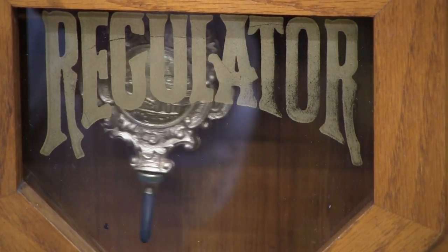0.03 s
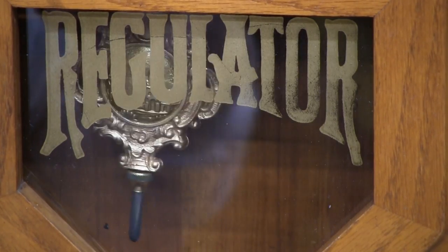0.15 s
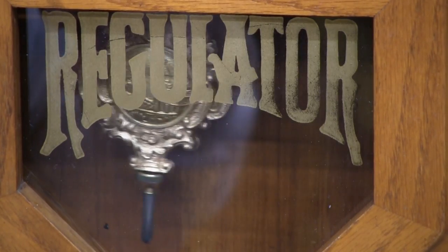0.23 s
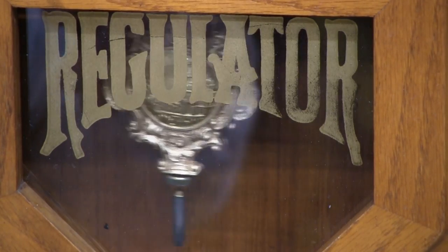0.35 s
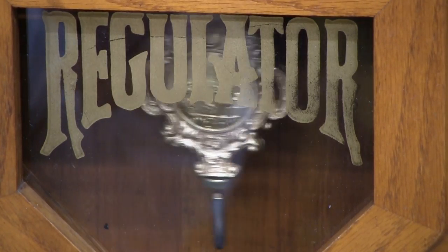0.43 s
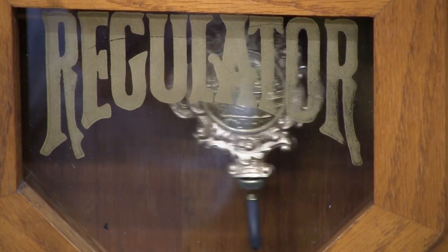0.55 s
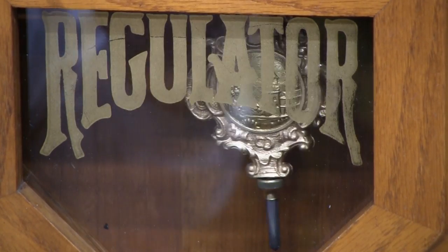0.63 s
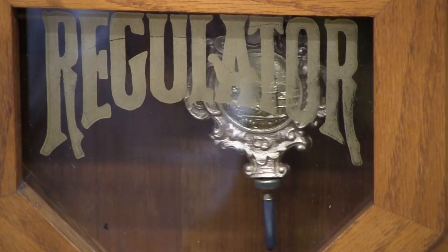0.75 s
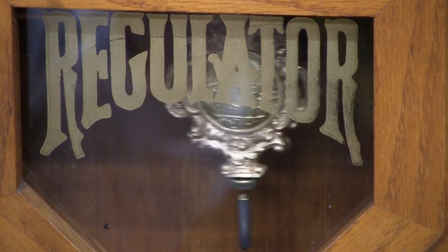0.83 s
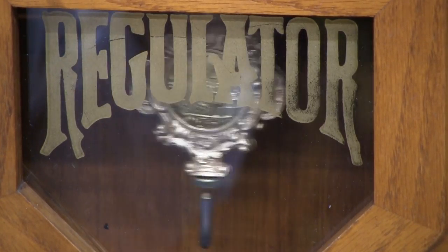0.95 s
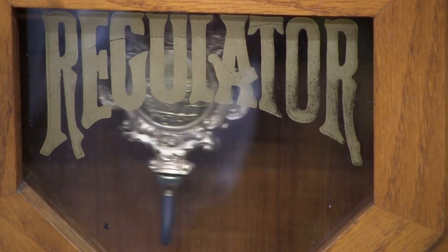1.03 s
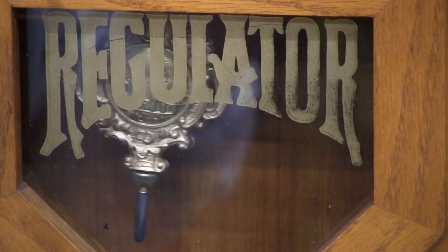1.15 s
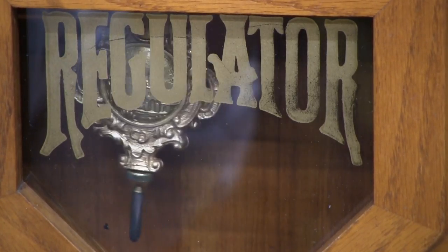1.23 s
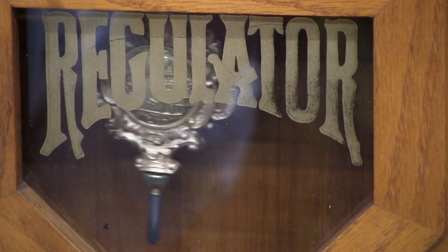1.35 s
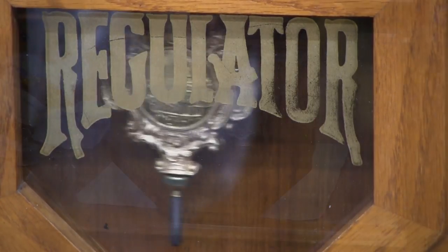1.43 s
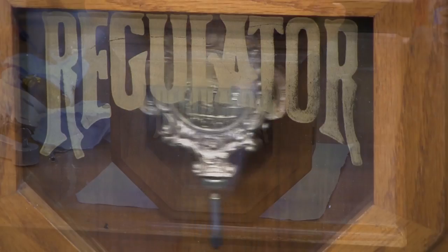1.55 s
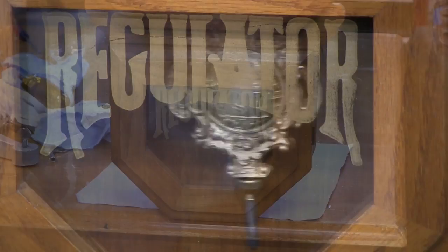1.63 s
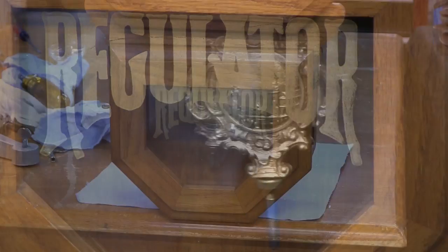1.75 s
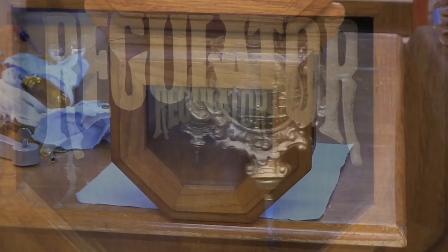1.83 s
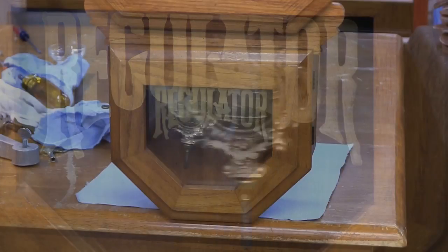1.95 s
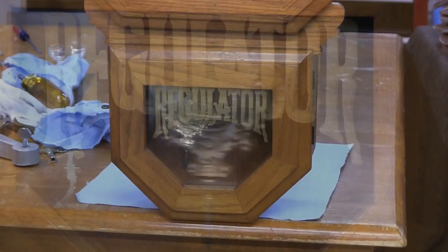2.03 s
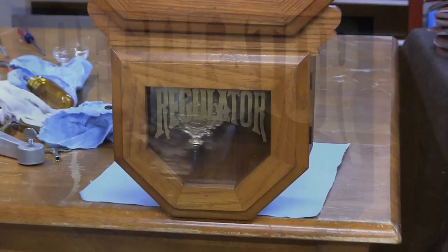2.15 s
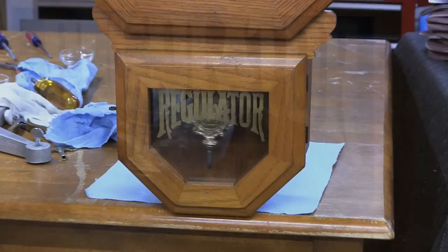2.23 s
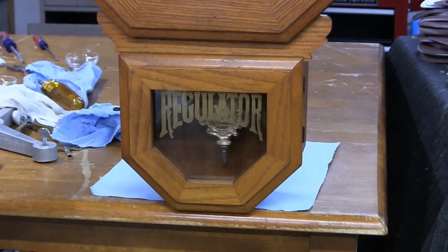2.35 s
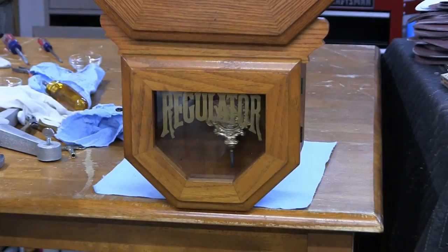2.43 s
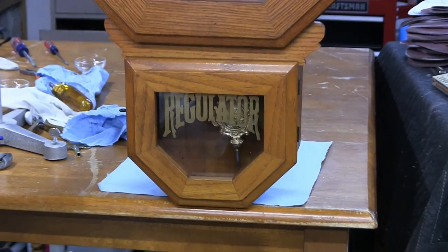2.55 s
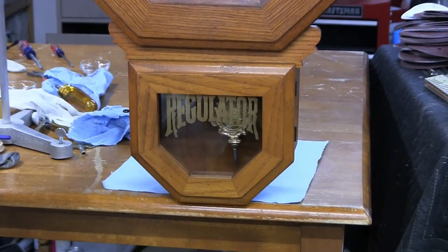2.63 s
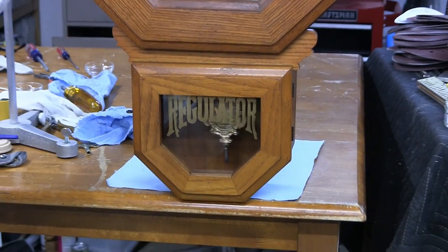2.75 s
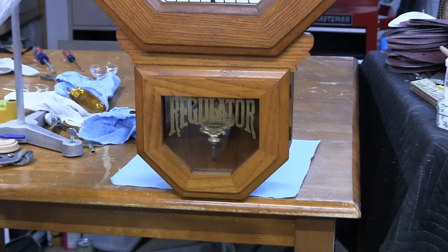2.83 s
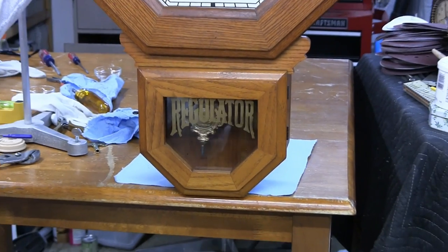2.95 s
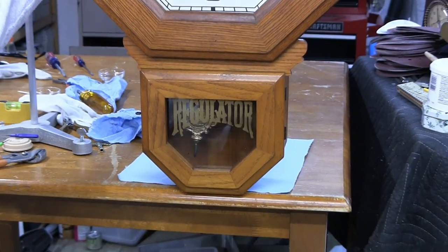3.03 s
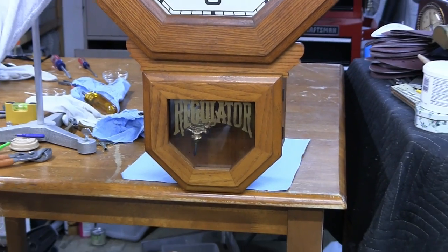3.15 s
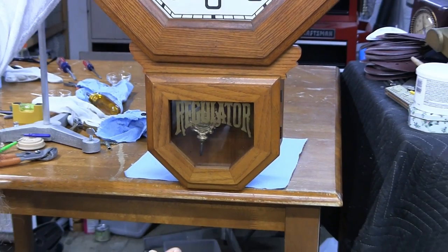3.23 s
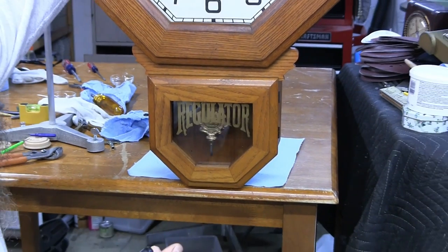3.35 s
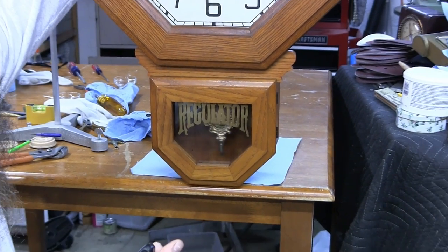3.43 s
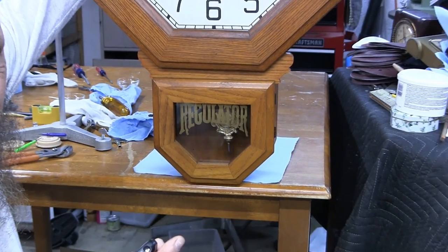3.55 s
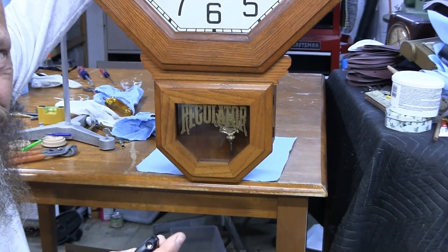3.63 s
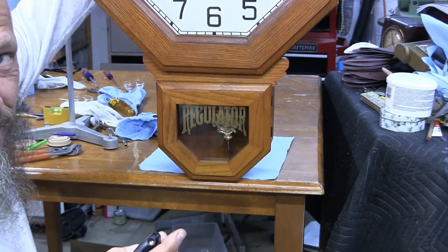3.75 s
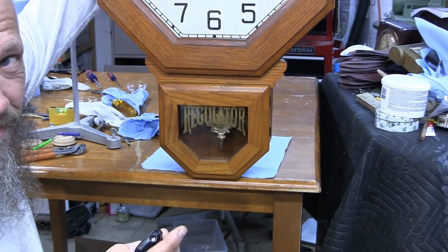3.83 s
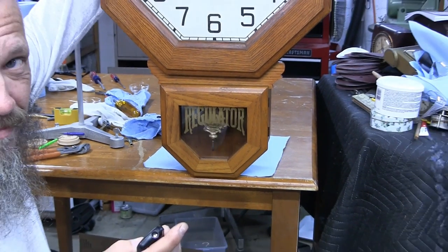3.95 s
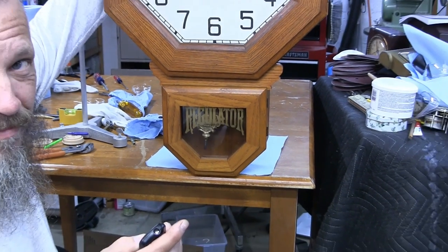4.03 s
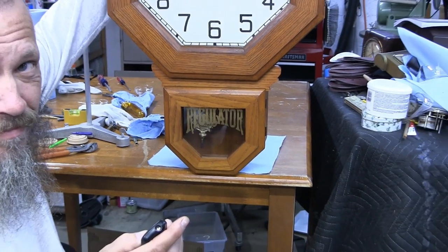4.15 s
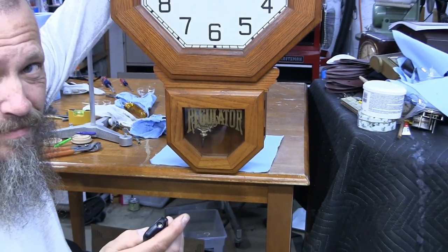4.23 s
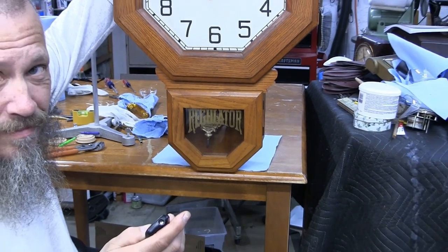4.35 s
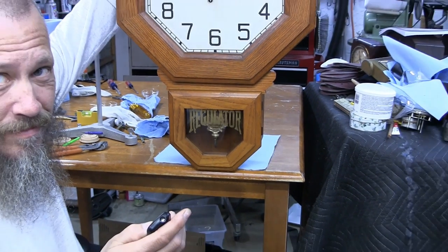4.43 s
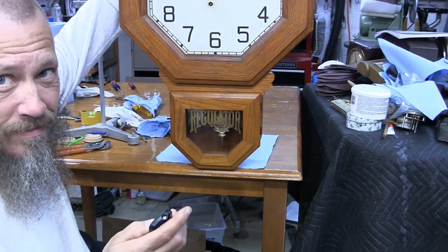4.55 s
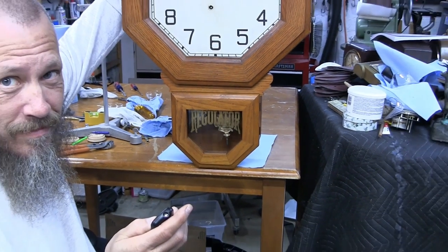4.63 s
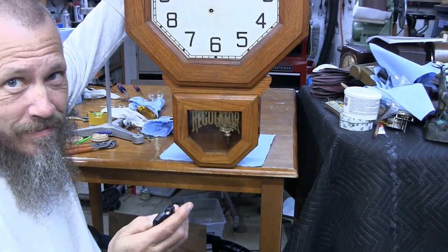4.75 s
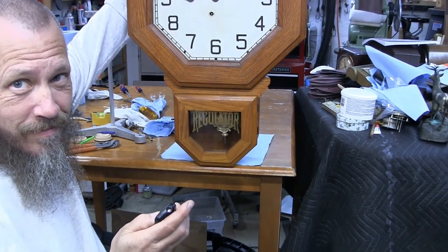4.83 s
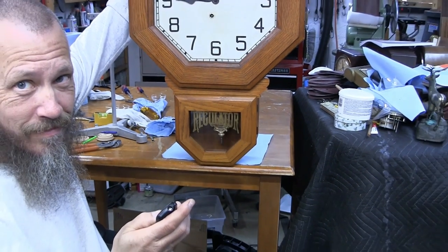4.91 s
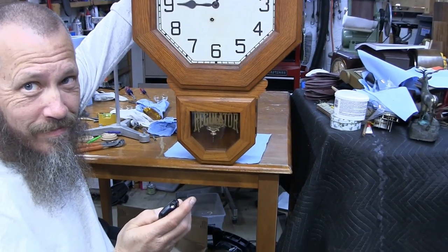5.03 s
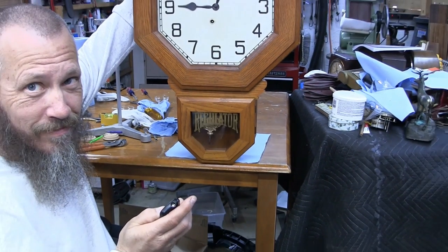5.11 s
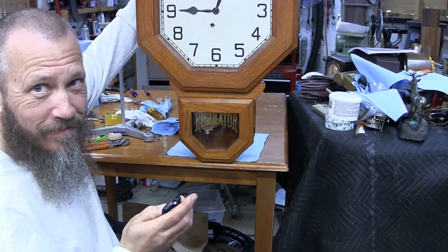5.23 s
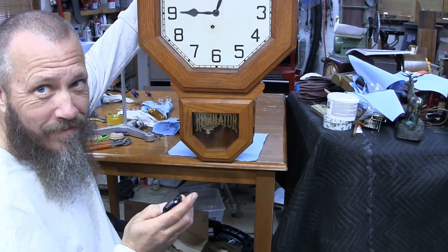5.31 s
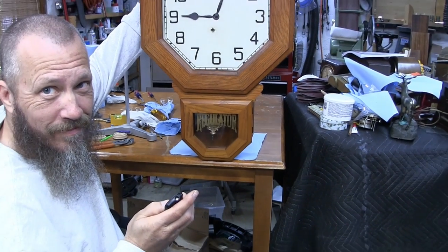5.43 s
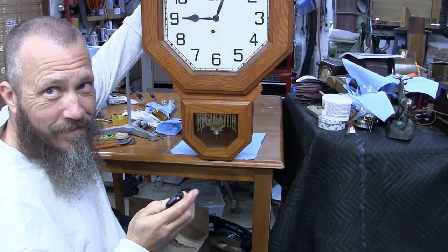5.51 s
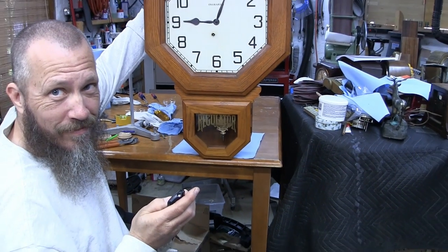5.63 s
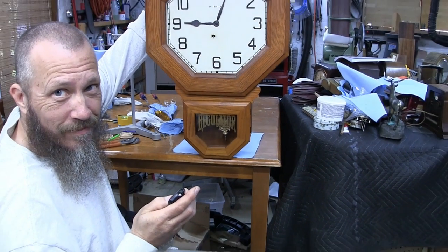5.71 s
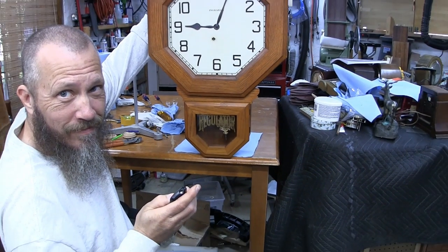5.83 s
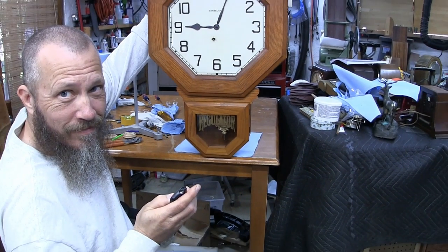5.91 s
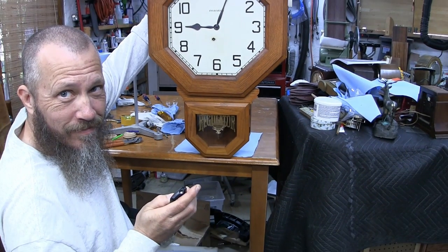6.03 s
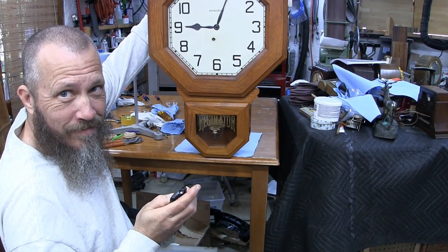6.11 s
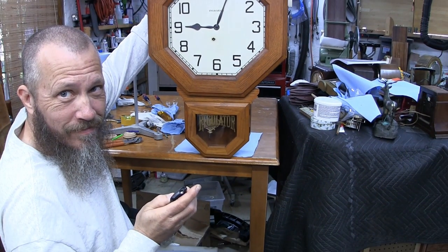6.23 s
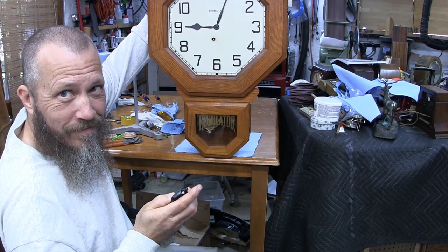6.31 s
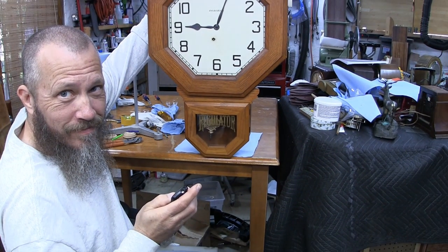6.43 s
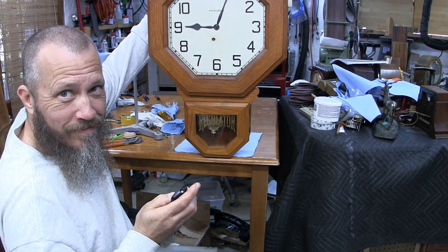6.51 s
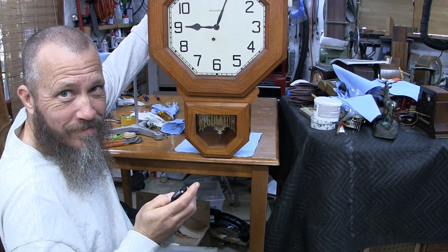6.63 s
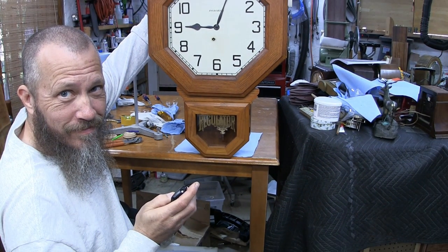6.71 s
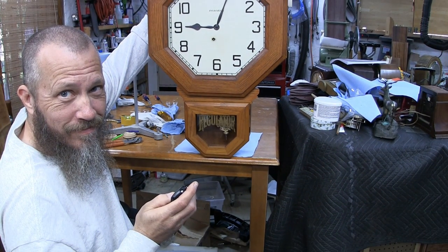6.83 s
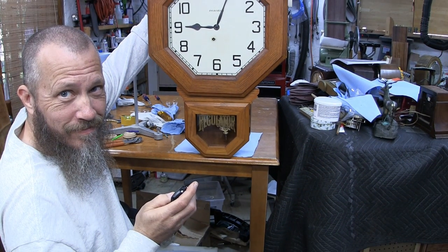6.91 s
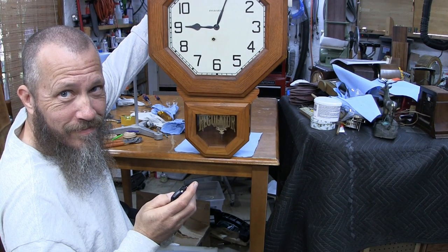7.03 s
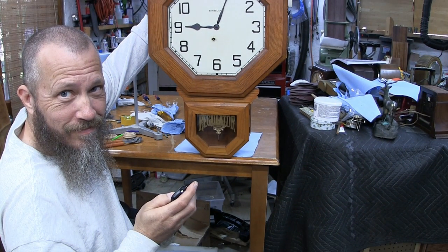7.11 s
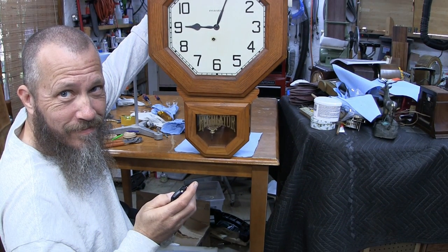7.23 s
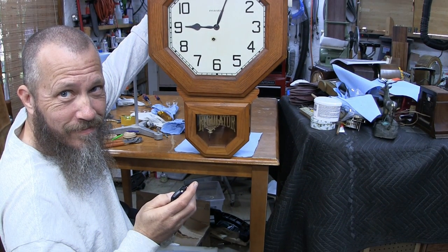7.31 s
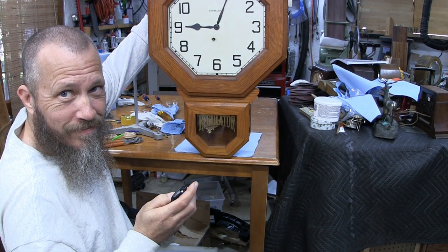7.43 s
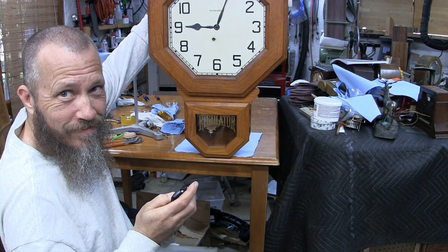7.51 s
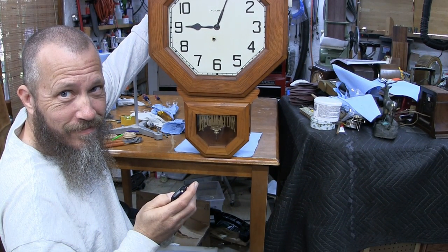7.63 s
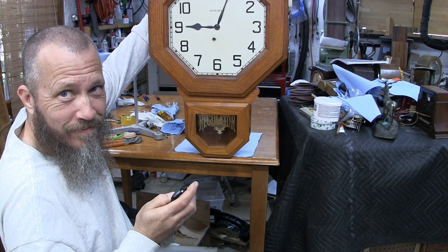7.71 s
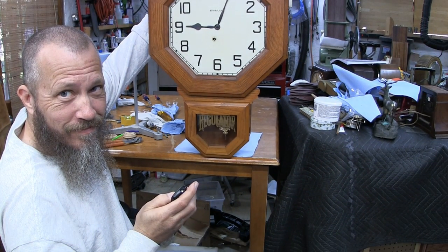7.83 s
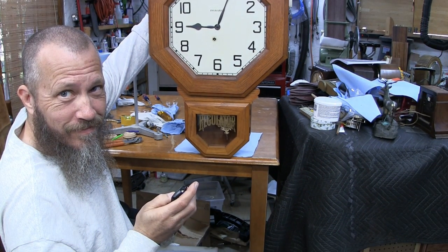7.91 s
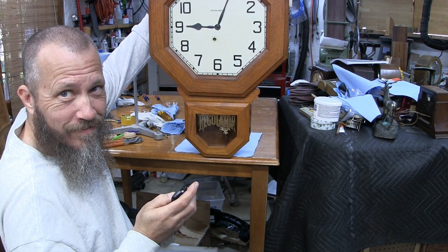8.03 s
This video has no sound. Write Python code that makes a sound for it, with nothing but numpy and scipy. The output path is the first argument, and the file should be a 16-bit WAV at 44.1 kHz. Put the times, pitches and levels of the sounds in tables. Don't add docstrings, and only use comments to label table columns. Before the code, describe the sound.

A wood-cased pendulum clock beats in a small, quiet workshop, heard by a close stereo camera microphone. A crisp tick lands at about 0.06 seconds, a woody tock at 0.66, another tick at 1.14. Tick and tock have slightly different colours, ringing briefly in case, glass and brass. A faint click comes about a tenth of a second before each tock. Between 1.3 and 2.45 seconds a slow crossfade softens the beats: weak tock at 1.75, soft tick at 1.92, fainter one at 2.2. A strong tock at 2.47 restores the steady rhythm, roughly half a second apart, through a last tock near 7.85. Soft low fan hum, air and hiss run throughout. Tiny creaks and clicks gather mostly before 4 seconds, with two later ones; a dull, far rumble swells briefly around 4.3. Reflections are short.

```python
import sys
import numpy as np
from scipy import signal
from scipy.fft import rfft, irfft, next_fast_len
from scipy.io import wavfile
from scipy.ndimage import uniform_filter1d

SR = 44100
rng = np.random.default_rng(int(sys.argv[2]) if len(sys.argv) > 2 else 0)


def to_linear_factor(level_db):
    exponent = np.asarray(level_db, float) / 20
    return 10 ** exponent


def generate_wav(sig):
    pcm = np.round(np.clip(np.atleast_2d(sig).T, -1, 1) * 32767).astype(np.int16)
    wavfile.write(sys.argv[1], SR, pcm)


N = 355887


def bin_hz(n):
    return np.arange(n // 2 + 1) * SR / n + 1


def shape(n, table):
    hz, db = np.transpose(table)
    return to_linear_factor(np.interp(np.log(bin_hz(n)), np.log(hz), db))


def unit(x):
    return x / np.sqrt(np.mean(x ** 2))


def fade(t, t60):
    return np.exp(-np.log(1000) * t / np.maximum(t60, .01))


def walk(rate_hz):
    hold = int(SR / rate_hz)
    steps = np.repeat(rng.standard_normal(N // hold + 1), hold)
    return uniform_filter1d(uniform_filter1d(steps, hold), hold)[:N]


def resonance(hz, width_hz, n):
    f = bin_hz(n)
    response = 1 / (1 + 1j * (f / hz - hz / f) * hz / width_hz)
    return unit(irfft(rfft(rng.standard_normal(n)) * response, n))


def add(track, start_s, sound):
    i = int(start_s * SR)
    track[i:i + len(sound)] += sound[:N - i]


def both_views(first_db, second_db):
    fade_start_s, fade_end_s = 1.33, 2.45
    second = np.interp(np.arange(N) / SR, [fade_start_s, fade_end_s], [0, 1])
    return np.hypot((1 - second) * to_linear_factor(first_db), second * to_linear_factor(second_db))


# [pitch_hz, level_db (per Hz)]
AIR_COLOR = [(13, -52), (22, -9), (43, -20), (55, -8), (76, -6), (147, -1), (169, -6), (199, -9),
             (241, -9.5), (292, -6.5), (374, -10.5), (832, -13.5), (981, -16.5), (2240, -20), (15800, -27)]
# [pitch_hz, likeness (0-1)]
AIR_LIKENESS = [(60, 0.15), (130, 0.46), (300, 0.47), (700, 0.33), (1500, 0.35), (4000, 0.29),
                (12000, 0.19)]


def air():
    n = next_fast_len(N)
    hz, like = np.transpose(AIR_LIKENESS)
    like = np.clip(np.interp(np.log(bin_hz(n)), np.log(hz), like), 0, 1)
    noise = rfft(rng.standard_normal((2, n))) * shape(n, AIR_COLOR)
    mid, side = noise * np.sqrt([1 + like, 1 - like])
    stereo = unit(irfft(np.array([mid + side, mid - side]), n)[:, :N])
    return stereo * both_views(-54.5, -54.5) * to_linear_factor(2.5 + .5 * walk(2.16))


# [pitch_hz, width_hz, level_db]
FAN_HUM = [(72.3, 0.63, -1), (112, 6.6, -8), (144.5, 3.8, -16.5), (208, 8.4, -10.5), (300, 2.2, -10)]


def fan():
    t = np.arange(N) / SR
    hum = 0
    for hz, width_hz, level_db in FAN_HUM:
        tone = np.sqrt(2) * np.sin(2 * np.pi * (hz * t + rng.random()))
        tone = tone * to_linear_factor(1.4 * walk(3.36))
        share = np.clip(width_hz / 6, 0, 1)
        flutter = resonance(hz, width_hz, next_fast_len(N))[:N]
        hum = hum + to_linear_factor(level_db) * ((1 - share) * tone + share * flutter)
    left_right = to_linear_factor(np.array([[-.8], [.8]]))
    return hum * left_right * both_views(-59, -57)


def rumble():
    peak_s, half_s, level_db = 4.3, 0.25, -61.5
    swell = np.exp(-((np.arange(N) / SR - peak_s) / half_s) ** 2)
    return to_linear_factor(level_db) * swell * resonance(398, 510, next_fast_len(N))[:N]


STRAY_STARTS = [.288, .54, .56, .73, .775, 1.74, 2.2395, 2.5, 2.8165, 2.99, 3.085, 3.241, 3.549, 3.925,
                6.722, 7.705]
# [level_db, pitch_hz, width_hz, t60_s]
STRAY_SOUNDS = [(-56, 2280, 200, .12), (-59.5, 6800, 400, .21), (-57, 5600, 1500, 0.45),
                (-57.5, 6800, 2500, 0.36), (-51.5, 1820, 240, 0.13), (-48, 2222, 880, .051),
                (-45.5, 900, 416.7, 0.067), (-58.5, 6000, 2500, .061), (-45.5, 730, 290, 0.059),
                (-50, 5960, 110, .15), (-62, 4950, 450, .38), (-56.5, 520, 540, .061),
                (-45, 2200, 600, .051), (-60, 4600, 900, 0.41), (-49, 440, 55, .11), (-61, 5000, 130, 0.17)]


def strays():
    t, out = np.arange(9000) / SR, np.zeros(N)
    for start_s, (level_db, hz, width_hz, t60_s) in zip(STRAY_STARTS, STRAY_SOUNDS):
        envelope = fade(t, t60_s) * (1 - np.exp(-t / 0.00061))
        add(out, start_s, to_linear_factor(level_db) * resonance(hz, width_hz, len(t)) * envelope)
    return out


def strikes(events, hz, t60, mode_db, rise, dense, dense_db, dense_t60, crack_db, vary_db):
    t = np.arange(9000) / SR
    out = np.zeros(N)
    start = 2 * np.pi * rng.random(len(hz)) / (1 + (520 / hz) ** 10)
    swell = fade(t, t60[:, None]) * (1 - np.exp(-t / np.maximum(rise[:, None], 1e-4)))
    usual = rng.standard_normal(len(t))
    crack = to_linear_factor(crack_db) * np.sin(2 * np.pi * 2500 * t) * np.exp(-((t - .0018) / 0.00038) ** 2)
    board = np.exp(-(np.log(hz / 430) / 0.088) ** 2)
    door = np.exp(-(np.log(hz / 1030) / 0.34) ** 2)
    treble = 1 / (1 + (2450 / hz) ** 8)
    for start_s, blow_db, board_db, door_db, treble_db in events:
        level_luck, pitch_luck, phase_luck = rng.standard_normal((3, len(hz)))
        blow_shape = board_db * board + door_db * door + treble_db * treble
        gain = to_linear_factor(mode_db + blow_shape + vary_db * level_luck)
        pitch = hz * (1 + 0.0018 * pitch_luck)
        phase = 2 * np.pi * pitch[:, None] * t + (start + 0.39 * phase_luck)[:, None]
        modes = gain @ (swell * np.sin(phase)) / np.linalg.norm(to_linear_factor(mode_db))
        crowd = usual + 0.72 * rng.standard_normal(len(t))
        crowd = unit(irfft(rfft(crowd) * shape(len(t), dense), len(t)))
        crowd = crowd * fade(t, dense_t60) * (1 - np.exp(-t / 0.0033))
        add(out, start_s, to_linear_factor(blow_db) * (modes + to_linear_factor(dense_db) * crowd + crack))
    return out


# [start_s, blow_db, board_db, door_db, treble_db]
UNLOCK_BLOWS = [
    (0.564, -44, 7.5, 5, 3),
    (1.646, -47, 5, -5, 2),
    (2.399, -43.5, 7, 0, 2),
    (3.475, -41, -4, 0, 5),
    (4.555, -41.5, 3.5, 3, 3),
    (5.637, -42, 6, -5, 2),
    (6.724, -43, 11.5, -9, 3),
    (7.786, -41, 4, -7, 0),
]
# [pitch_hz, width_hz, level_db]
PALLET_RINGS = [(430, 46, 3.5), (758, 48, 3), (1055, 44, -16.5), (2240, 41, 0), (3310, 70, -3),
                (5770, 70, -6), (6500, 40, -13), (7300, 40, -6)]
# [pitch_hz, level_db (per Hz)]
TOCK_CROWD = [(380, -18), (650, -5), (853, -14), (1030, -0.5), (1240, -9.5), (1710, -8.5), (3090, -7.5),
              (3580, -16), (4480, -22), (4760, -25.5), (7720, -20), (8620, -40), (12500, -35), (16200, -71),
              (22000, -120)]


def unlocking():
    hz, width_hz, level_db = np.transpose(PALLET_RINGS)
    rise = np.full(len(hz), .003)
    return strikes(UNLOCK_BLOWS, hz, 3.3 / width_hz, level_db, rise, TOCK_CROWD,
                   dense_db=-5, dense_t60=0.17, crack_db=-4, vary_db=2.5)


# [start_s, blow_db, board_db, door_db, treble_db]
TICK_BLOWS = [
    (.0645, -29, -1, -6, -2),
    (1.1356, -30, 0, -2.5, 3.5),
    (1.9195, -37.5, 1, 2, 0),
    (2.2045, -46.5, 9, 2, -0.5),
    (2.9855, -30, 0.5, -2, 1),
    (4.056, -30, 4, -4, 2),
    (5.1278, -30, 3, -4.5, 3),
    (6.1985, -29.5, 8, -2, 0.5),
    (7.2733, -29, 2.5, -2, 0),
]
TOCK_BLOWS = [
    (.6551, -30, 3.5, 0, 0),
    (1.751, -36.5, 4, -4, 0),
    (2.4746, -29, -2, 2.5, 0),
    (3.5547, -29, -3, 3.5, 0),
    (4.631, -29, 2.5, 0.5, 0),
    (5.7118, -29.5, 0.5, -5, 0),
    (6.7965, -31, 7, -10, 0),
    (7.8497, -29, 2, 0, 0),
]
# [pitch_hz, t60_s, tick level_db, tock level_db]
CLOCK_RINGS = [(220.4, 0.17, -6.5, -19), (440.5, 0.08, 0.5, -1), (505, 0.25, -10, -15.5),
               (574, 0.15, 0.5, 2.5), (769, 0.17, -6, -5.5), (999, 0.11, -3, 2), (1086, 0.14, -8, -2),
               (1491, 0.17, -9.5, -11), (1636, 0.087, -4, -5.5), (1795, 0.21, -14, -14),
               (1763, 0.065, -12, -1.5), (1880, 0.043, -10, -3), (1998, 0.08, 3.5, -13),
               (2066, 0.081, -2, -26), (2194, 0.085, -8, -4), (2250, 0.073, -2, -5), (2400, 0.095, -11, -27),
               (2490, 0.094, -3, -10), (2660, 0.068, 4.5, -1.5), (2830, 0.035, -12, -7.5),
               (2750, 0.091, -10, -46), (2920, 0.07, -12, -12), (3095, 0.11, -9, -5), (3240, 0.13, -13, -11),
               (3430, 0.048, -15, -16), (4000, 0.13, -12.5, -25), (5930, 0.21, -21, -50),
               (7650, 0.05, -13, -6.5), (7650, 0.15, -16.5, -36), (7680, 0.33, -27, -32),
               (306, 0.2, -12.5, -33), (333.5, 0.13, -9.5, -20.5), (385.5, 0.081, -8, -6.5),
               (406, 0.16, -8, -9.5), (475, 0.15, -7, -7.5), (840, 0.1, -6.5, -9), (1110, 0.15, -11.5, -6),
               (3270, .12, -23, -38), (4330, .12, -18, -11), (3960, 0.095, -11, -11),
               (4240, 0.16, -12.5, -34), (4150, 0.18, -21, -17.5), (5260, 0.092, -18, -19.5),
               (6190, 0.12, -28, -23.5), (7950, 0.11, -17, -40)]
# [pitch_hz, tick rise_s, tock rise_s]
CASE_RISE = [(300, 0.002, 0.0019), (460, 0.00075, 0.0018), (580, 0.016, 0.012), (786, .003, 0.0087),
             (1050, 0.0025, 0.0062), (2180, 0.00095, 0.001), (4270, 0.0047, 0.0034), (7700, 0.0045, 0.0041)]
# [pitch_hz, level_db (per Hz)]
TICK_CROWD = [(380, -48), (650, -14.5), (718, -12), (1370, -9), (2000, -2.5), (2180, -5), (3170, -9),
              (3580, -17), (4060, -13), (6330, -30), (7810, -18.5), (8620, -28.5), (12500, -36),
              (16200, -66), (22000, -120)]


def ticks_and_tocks():
    hz, t60, tick_db, tock_db = np.transpose(CLOCK_RINGS)
    at_hz, tick_rise, tock_rise = np.transpose(CASE_RISE)
    tick = strikes(TICK_BLOWS, hz, t60, tick_db, np.interp(hz, at_hz, tick_rise), TICK_CROWD,
                   dense_db=-7.5, dense_t60=0.18, crack_db=-6.5, vary_db=1.5)
    tock = strikes(TOCK_BLOWS, hz, t60, tock_db, np.interp(hz, at_hz, tock_rise), TOCK_CROWD,
                   dense_db=-8.0, dense_t60=0.19, crack_db=2.8, vary_db=2.0)
    return tick + tock


def room(dry):
    room_t60_s, room_db = 0.17, -8.5
    t = np.arange(14000) / SR
    onset = np.clip((t - .003) / 0.0011, 0, 1)
    echoes = rng.standard_normal((2, len(t))) * fade(t, room_t60_s) * onset
    echoes = signal.lfilter(*signal.butter(1, 900, "high", fs=SR), echoes)
    echoes = to_linear_factor(room_db) * echoes / np.linalg.norm(echoes, axis=1)[:, None]
    direct = dry * to_linear_factor(np.array([[.3], [-.3]]))
    return direct + signal.fftconvolve(dry[None], echoes, axes=1)[:, :N]


def scene():
    background = air() + fan()
    clock = to_linear_factor(6.0) * ticks_and_tocks() + to_linear_factor(-2.5) * unlocking()
    return room(rumble() + strays() + clock) + background


def band_limit(x):
    return signal.sosfilt(signal.butter(12, 15770, fs=SR, output="sos"), x)


def record(dry):
    top_cut = signal.ellip(10, .1, 70, 15740, fs=SR, output="sos")
    mix = signal.sosfilt(top_cut, dry)
    return band_limit(mix)


dry = scene()
out = record(dry)
generate_wav(out)
```